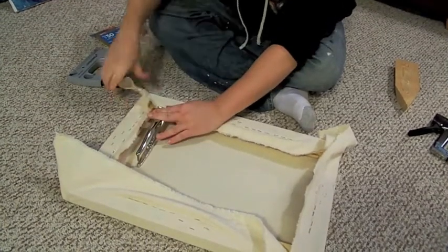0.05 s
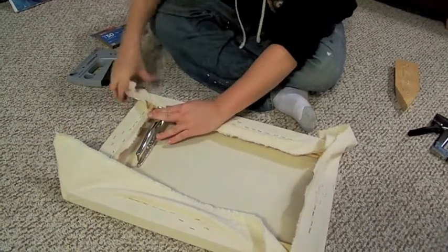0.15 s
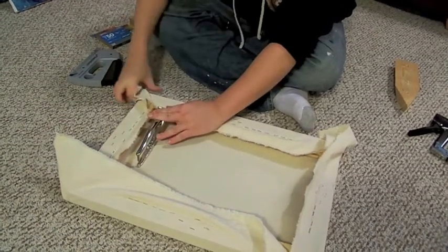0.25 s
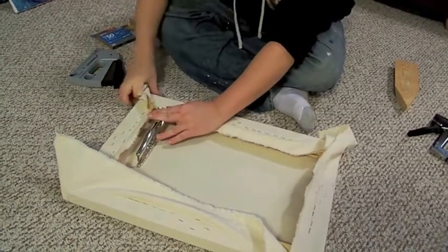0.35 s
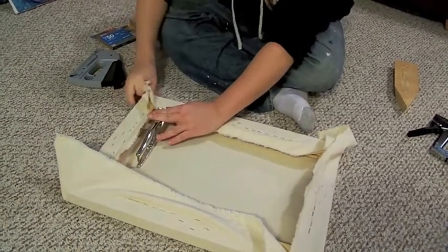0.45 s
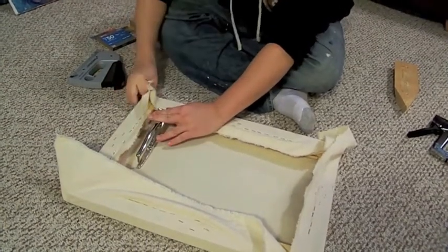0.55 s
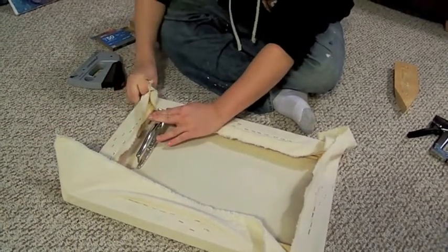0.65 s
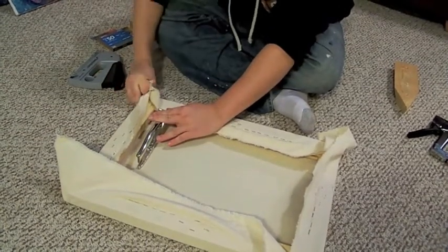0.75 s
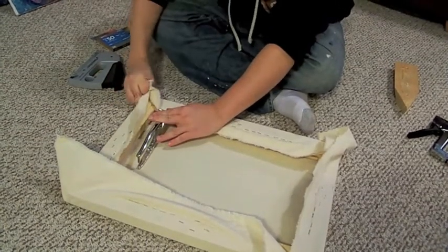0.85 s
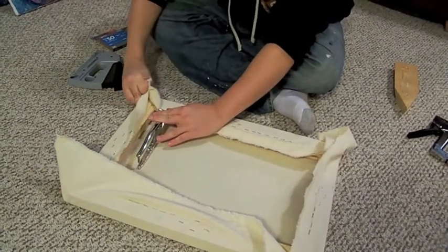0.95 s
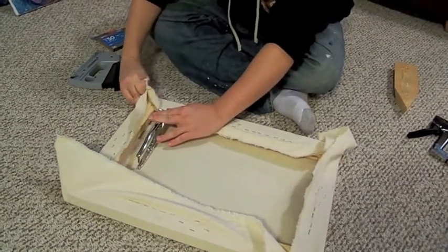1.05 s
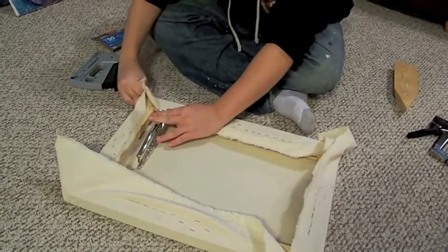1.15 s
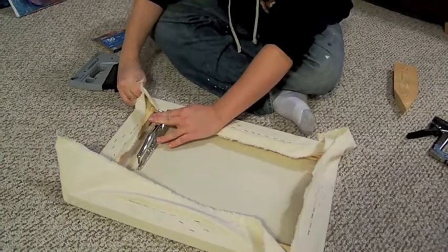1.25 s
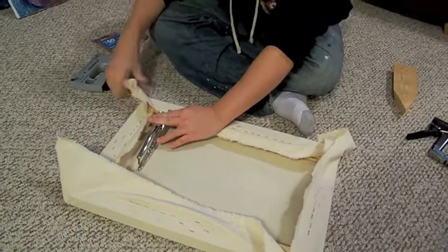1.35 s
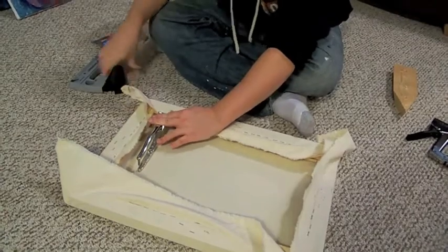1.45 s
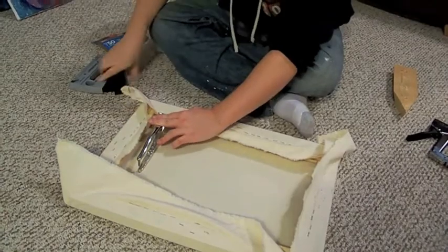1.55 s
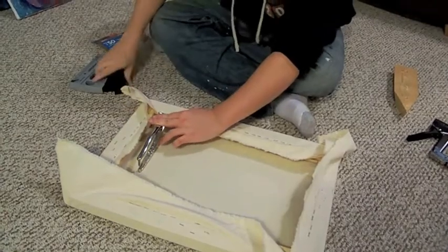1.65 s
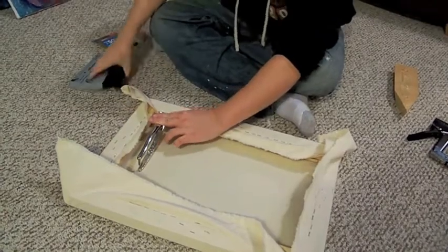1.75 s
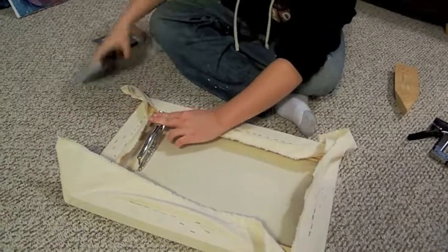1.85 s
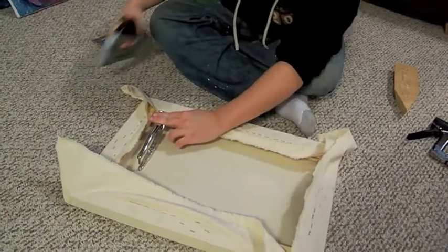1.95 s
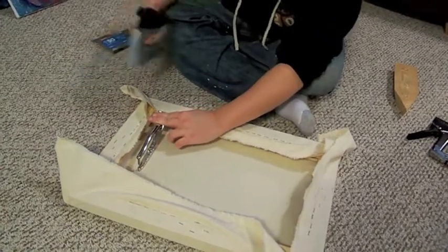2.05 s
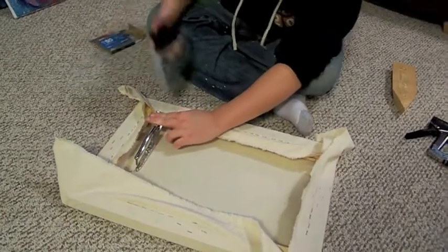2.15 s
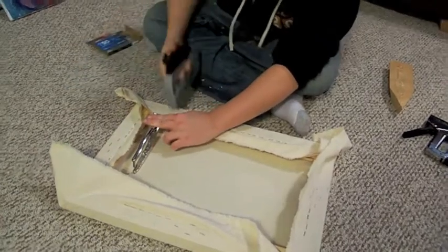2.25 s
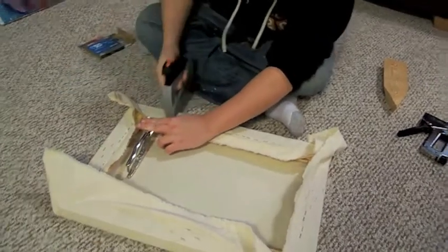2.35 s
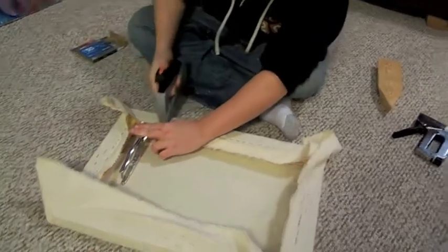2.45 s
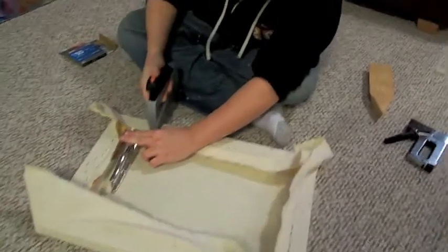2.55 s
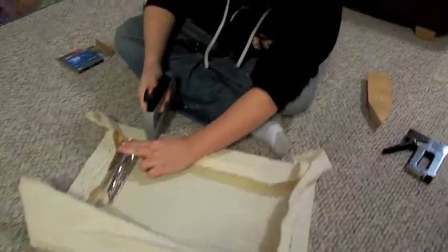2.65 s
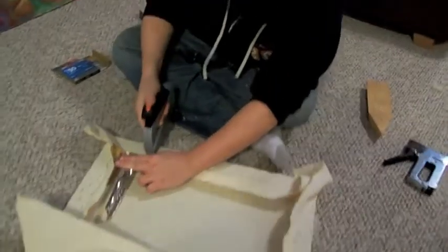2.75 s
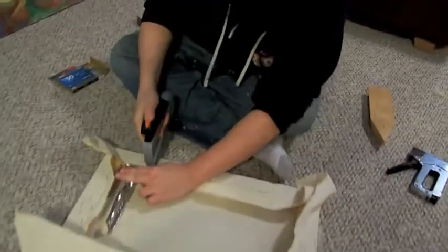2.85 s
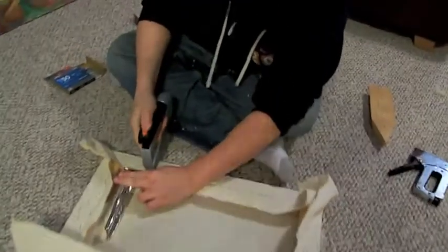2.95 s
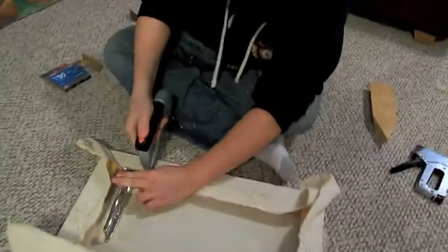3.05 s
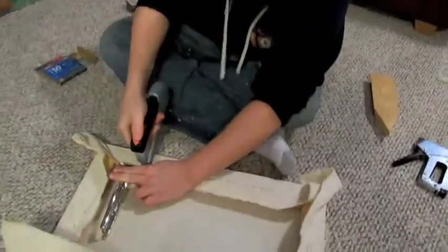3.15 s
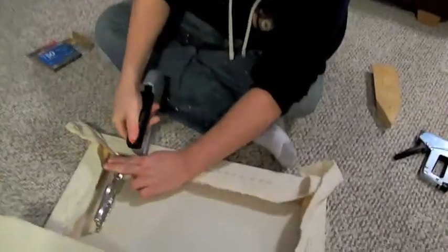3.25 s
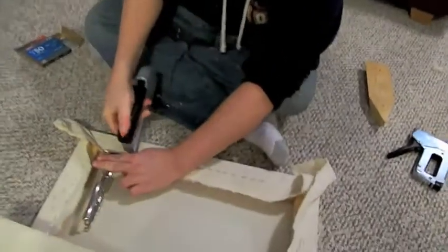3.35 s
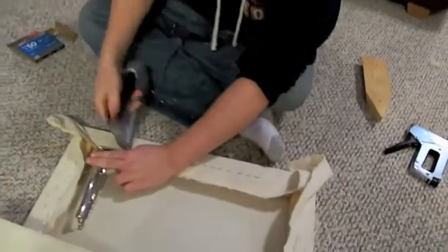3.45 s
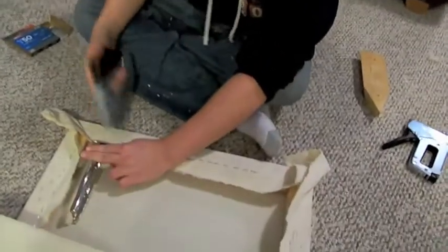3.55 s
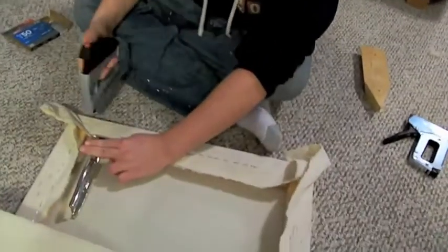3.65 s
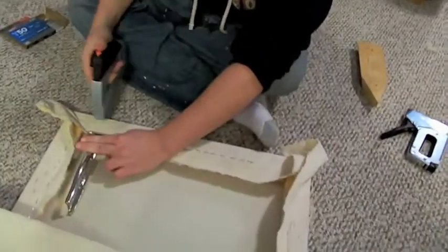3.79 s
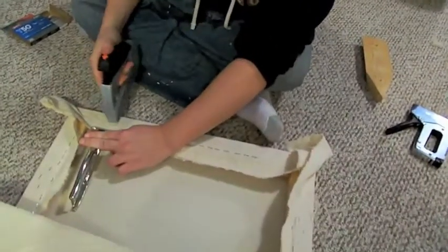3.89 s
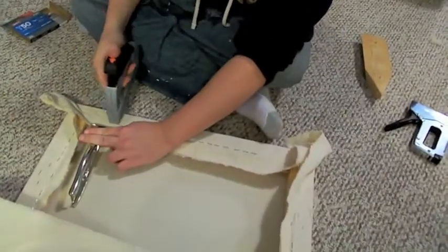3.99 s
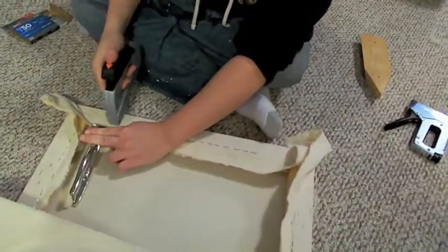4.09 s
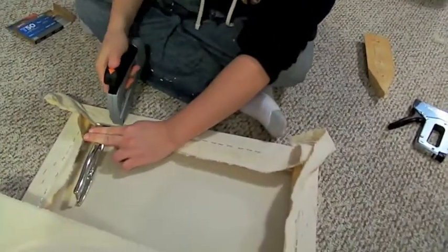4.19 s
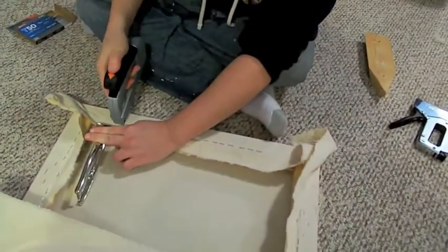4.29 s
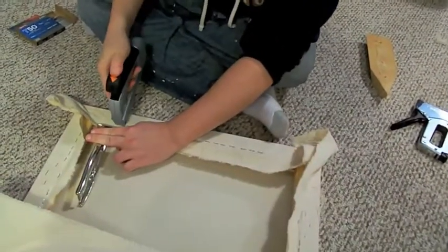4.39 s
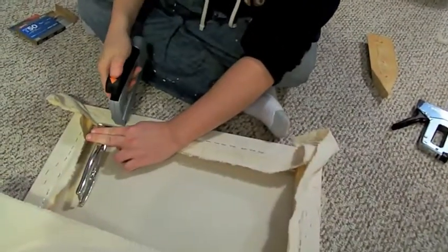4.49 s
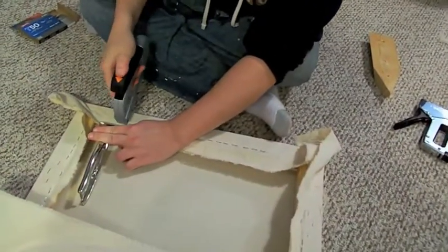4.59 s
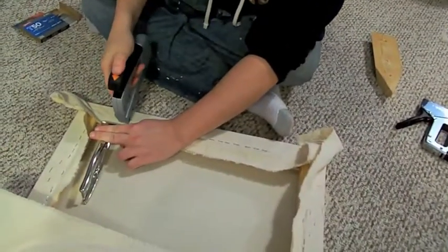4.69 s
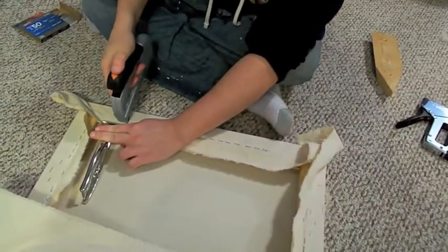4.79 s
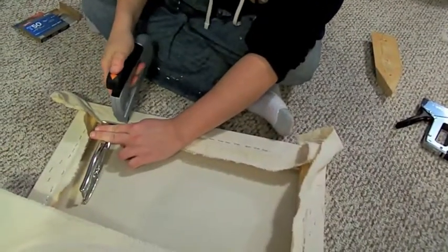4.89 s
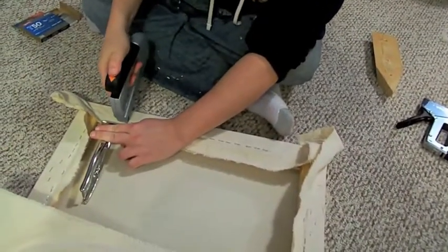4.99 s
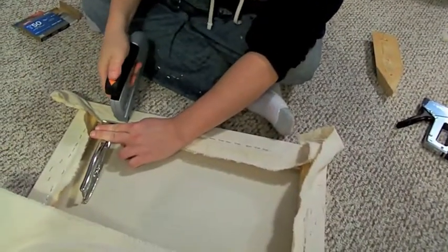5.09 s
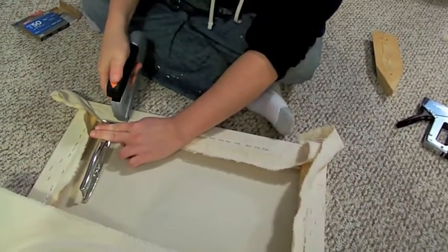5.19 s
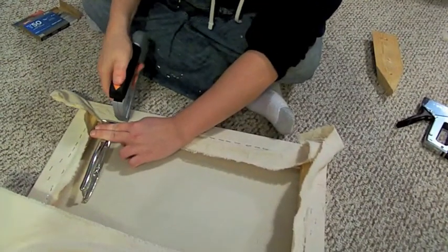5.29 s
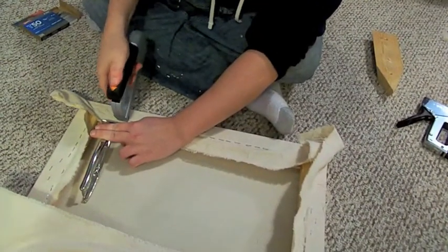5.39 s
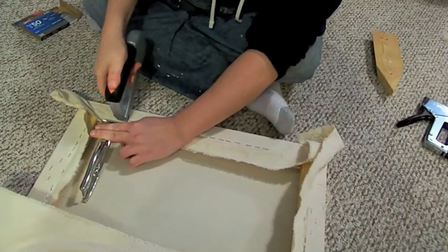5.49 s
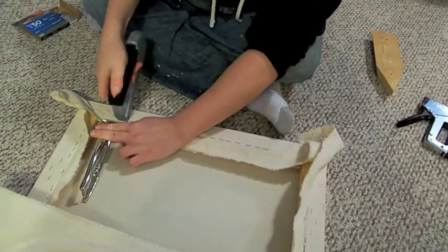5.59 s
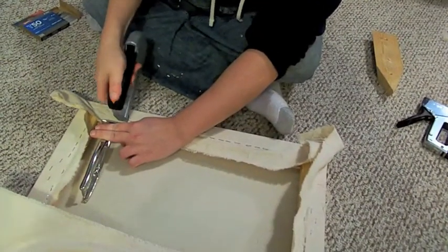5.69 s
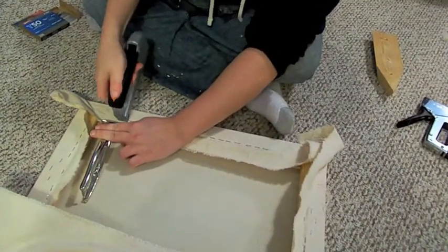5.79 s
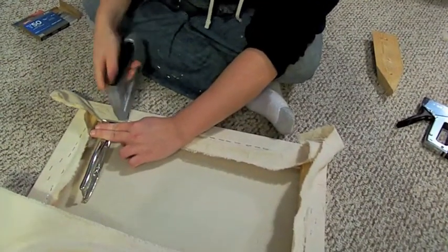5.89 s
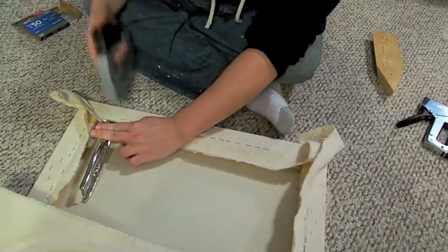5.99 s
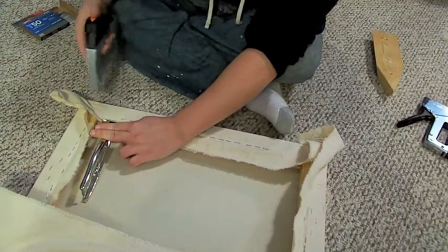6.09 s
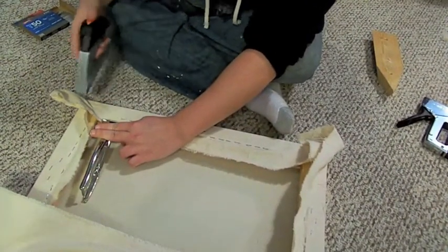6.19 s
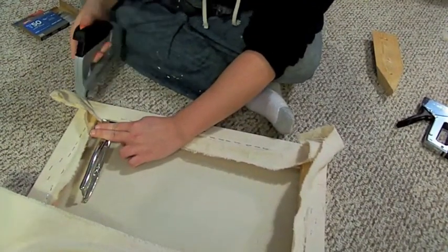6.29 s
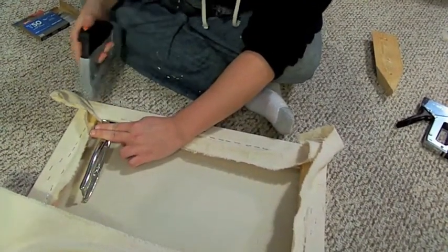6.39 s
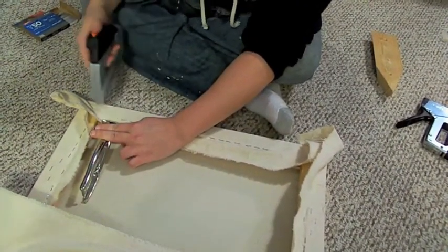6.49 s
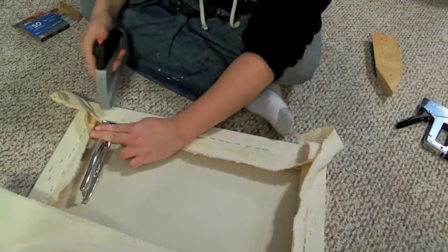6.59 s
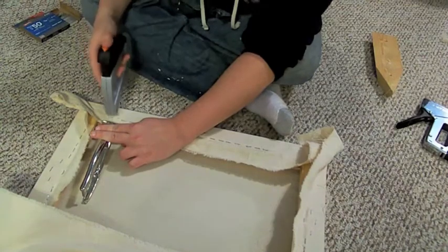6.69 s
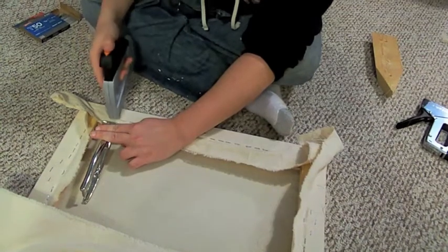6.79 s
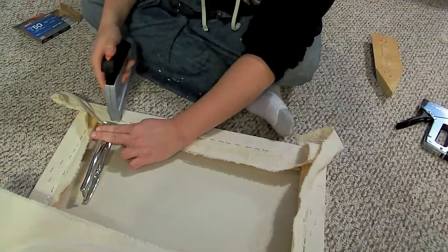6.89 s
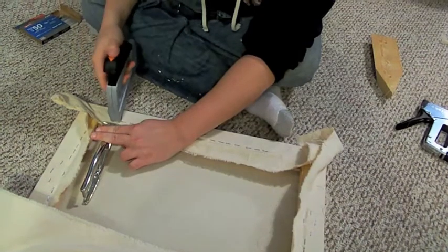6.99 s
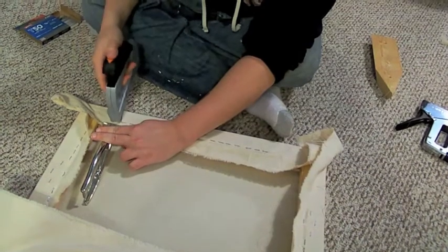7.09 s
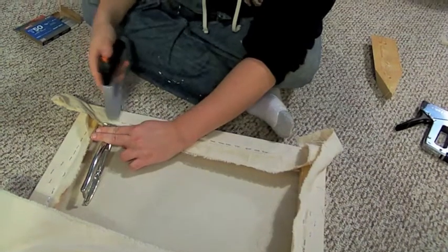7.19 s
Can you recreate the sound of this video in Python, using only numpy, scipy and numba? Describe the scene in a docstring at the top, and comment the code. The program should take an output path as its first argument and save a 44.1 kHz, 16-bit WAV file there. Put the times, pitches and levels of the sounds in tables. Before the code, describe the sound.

Over faint steady room noise, fingers softly brush canvas during the first two seconds. A steel staple gun clinks lightly as it is picked up from about 1.5 seconds, with a sharper clink at 2.1 and a few more around 3 seconds. At 3.3 seconds it fires into a wooden frame with a loud, sharp metallic snap and a brief hissy echo; the handle rattles back at 3.5. Soft, low floor rumbles follow as someone shifts their weight, mostly between 4.3 and 5 seconds. The gun clicks at 5.6 and fires again at 5.7, just as loud, with the handle rattling and clinking back around 6 seconds. Near 7 seconds there is a light knock and a faint scrape of the gun over the covered frame. The gun is close and slightly to the left, in a small carpeted room.

```python
"""A steel staple gun fires twice into canvas on a wooden frame, in a small carpeted room.
Each shot is a spring letting go and a driver (the staple pusher) slamming home; a quarter second later
the handle rattles back. Around the shots the gun clinks in the hand, fingers smooth the canvas and the
floor rumbles as someone shifts their weight. The camera's limiter turns each shot down and comes back up
about as fast as the echo fades, so the echo hangs as a hiss."""
import sys
import numpy as np
from scipy import signal
from scipy.fft import rfft, irfft
from scipy.io import wavfile
from scipy.ndimage import uniform_filter1d
from numba import njit

SR = 44100
rng = np.random.default_rng(int(sys.argv[2]) if len(sys.argv) > 2 else 0)


def master(y):
    """Save y as 16-bit WAV."""
    cut = np.clip(np.atleast_2d(y).T, -1, 1)
    pcm = np.round(cut * 32767)  # scale
    wavfile.write(sys.argv[1], SR, pcm.astype(np.int16))


N = 319328
TIME = np.arange(N) / SR
TREBLE_EDGE_HZ = 7600  # the camera loses the sound above this

# Tilt makes a sound brighter (+) or duller (-). A fade time, or t60, is the time to fall by 60 dB.
# tone of the steady background noise: (frequency [Hz], relative level [dB])
AIR_TONE = [(12, -32), (20, -2), (49, -1), (66, -8), (160, -11), (245, -13), (300, -22), (341, -18),
            (428, -17), (848, -17), (963, -21), (1120, -19), (4990, -25), (6430, -27), (8500, -54),
            (11000, -84), (18700, -120)]
# how alike that noise is on the left and right: (frequency [Hz], likeness [0-1])
AIR_LIKENESS = [(40, 0.9), (130, 0.68), (600, .55), (3000, 0.04), (7000, 0.13)]
# the gun clinks as it is picked up, set down, squeezed and lifted:
# (time [s], level [dB], tilt [dB/octave], struck part's pitch [Hz], wood knock [dB])
CLINKS = [(0.171, -39.5, -4, 5690, -16), (1.5095, -36.5, -2.5, 1536, -28), (1.5332, -38, 1.5, 1510, -12),
          (1.606, -55, 3, 2300, -22), (1.850, -34.5, -5.5, 1370, -27), (1.8632, -38.5, -8.5, 2200, -30),
          (2.013, -50, -10, 2250, -27), (2.105, -19.5, -6, 3450, -5.5), (2.129, -35.5, -3.5, 1407, -6),
          (2.8905, -31.5, 5, 2650, -15.5), (3.072, -49.5, -1.5, 4970, -18.5), (3.118, -30, -2, 2970, -10),
          (3.6449, -29.5, -4.5, 4950, -20), (3.6842, -43.5, -8.5, 2350, -22),
          (5.478, -47.5, -6.5, 2750, -28), (5.538, -47.5, -3, 4700, -26), (5.5704, -21.5, 1.5, 2950, -17.5),
          (5.9972, -23, -3, 1520, -21), (6.037, -36, -0.5, 1500, -15), (6.08, -37.5, -3, 2160, -20),
          (6.926, -50, -5, 1410, 6)]
# tone of steel hitting steel: (frequency [Hz], relative level [dB])
CONTACT_TONE = [(100, -33), (300, -15.5), (800, -16), (1400, -1), (2200, -2.5), (2700, 3), (3500, 3.5),
                (4500, 2), (5800, 2), (6900, -5), (7400, -15.5), (8000, -17.5)]
# notes the gun's steel case rings at: (pitch [Hz], relative level [dB], fade time [s])
CASE_NOTES = [(1270, -22, 0.076), (1405, -4, 0.32), (1520, 1.5, 0.24), (2015, -2, 0.21), (2140, 1.5, 0.23),
              (2160, 0.5, 0.23), (2855, 1, 0.16), (2750, -6, 0.14), (2970, -8, 0.12), (3360, -2, 0.19),
              (3970, 0.5, 0.054), (3797, -0.5, 0.12), (4440, -10, 0.15), (4260, -2.5, 0.3), (4530, 0, 0.42),
              (5300, -7, 0.06), (5490, -14, 0.098), (7660, -12.5, 0.14)]
# notes of the wooden frame, muffled by hand and carpet: (pitch [Hz], relative level [dB], fade time [s])
FRAME_NOTES = [(185, -4, 0.023), (254, -5, .04), (418, -4, 0.062), (558, -1, 0.045), (783, -2.5, 0.029),
               (1095, -6.5, 0.076), (1187, 2.5, 0.02)]
# the gun lies to the left: (frequency [Hz], left minus right [dB])
LEFT_BOOST = [(100, 5.5), (700, 0.5), (1300, 0), (2400, 4.5), (4400, 4.5), (8000, 0)]
# the room's echo: (frequency [Hz], relative level [dB], fade time [s])
ECHO_BANDS = [(100, -15.5, 0.99), (400, -7.5, 0.73), (1000, -4.5, 0.43), (2000, -3.5, 0.49),
              (3400, -1, 0.48), (5650, -9, 0.59), (8000, 16, 0.26)]
# fingers smooth the canvas: (time [s], length [s], level [dB])
FINGER_STROKES = [(.44, .14, -56.5), (1.03, .1, -63), (1.29, .07, -57.5), (1.62, .08, -57), (1.78, .1, -57),
                  (4.09, .04, -56.5), (4.81, .05, -62)]
# weight shifts on the floor: (time [s], level [dB], pitch [Hz], fade time [s])
WEIGHT_SHIFTS = [(2.07, -39.5, 39, 1.46), (3.12, -52.5, 55, 1.1), (3.68, -42.5, 78, 1.02),
                 (4.29, -33.5, 76, 0.69), (4.33, -38.5, 42, 2), (4.769, -37, 21.86, 1.44),
                 (4.79, -38, 58, 1.3), (5.28, -51, 78, 2.7), (5.86, -43, 66, 2.42), (6.38, -42, 78, 0.85),
                 (6.71, -46, 30, 3.2), (6.929, -46.5, 64, 2)]
# the gun's nose drags over the covered frame: (time [s], length [s], level [dB])
NOSE_STROKES = [(3.0, 0.075, -57), (7.118, 0.0096, -38), (7.17, 0.091, -53.5)]
# the two shots: (spring time [s], driver delay [s], handle time [s], level [dB], extra tilt [dB/octave])
SHOTS = [(3.2860, .0066, 3.5195, 0, 1), (5.6976, .0043, 5.9445, -.5, -1.5)]
# the two blows of a shot, spring then driver: (level [dB], contact length [ms], tilt [dB/octave],
# struck part's pitch [Hz], steel ring [dB], wood knock [dB])
SPRING_BLOW = (-8.5, 0.1, -3, 3000, -27.5, -12)
DRIVER_BLOW = (21.5, 4, 0.03, 5900, -35.5, -19)
# the latch slides over the driver, drops in and snaps tight; the handle meets its stop, slams home and
# shudders: (time after the latch drops in [s], level [dB], contact length [ms], tilt [dB/octave],
# struck part's pitch [Hz], steel ring [dB], wood knock [dB])
HANDLE_BLOWS = [(-.0365, -26, 2, 3, 6680, -15, -26), (0, -11.5, 1, -1.5, 1914, -16.5, -21),
                (.001, -12.5, 2.9, 10.5, 6320, -19.5, -21), (.018, -18.5, 2, -1, 2650, -10.5, -39.5),
                (.026, -13, 4.2, -0.5, 2520, -11.5, -22), (.033, -23.5, 6, -3.5, 1520, -7, -18)]


def gain(db):
    """Turn decibels into a number to multiply by."""
    return 10 ** (np.asarray(db) / 20)


def unit(x):
    """Scale a sound so that its average strength (rms) is 1."""
    return x / np.sqrt(np.mean(x ** 2))


def fade(t, t60_s):
    """A curve that starts at 1 and falls by 60 dB every t60_s seconds."""
    return np.exp(-np.log(1000) * t / t60_s)


def read_curve(hz, points):
    """Read between (frequency, value) points, spacing frequencies as the ear does."""
    point_hz, values = np.transpose(points)
    return np.interp(np.log(hz + 1), np.log(point_hz + 1), values)


def shaped(x, gain_at):
    """Change a sound's tone: multiply each frequency by gain_at(frequency)."""
    hz = np.linspace(0, SR / 2, x.shape[-1] // 2 + 1)
    return irfft(rfft(x) * gain_at(hz), x.shape[-1])


def band(x, low_hz, high_hz, order=2):
    """Keep the part of a sound between two frequencies."""
    return signal.sosfilt(signal.butter(order, [low_hz, high_hz], "band", fs=SR, output="sos"), x)


def stereo_noise(size, likeness):
    """Left and right noise: likeness 1 makes them the same, 0 unrelated."""
    mid, side = rng.standard_normal((2, size))
    return (np.sqrt(1 + likeness) * mid + np.sqrt(1 - likeness) * np.array([side, -side])) / np.sqrt(2)


def add(out, time_s, sound):
    """Mix a sound into both channels at the given time."""
    start = int(time_s * SR)
    out[:, start:start + sound.shape[-1]] += sound


def air(level_db=-54):
    """Steady room noise and microphone hiss, more alike left and right in the bass."""
    mid, side = rng.standard_normal((2, N))
    mid = shaped(mid, lambda hz: np.sqrt(1 + read_curve(hz, AIR_LIKENESS)))
    side = shaped(side, lambda hz: np.sqrt(1 - read_curve(hz, AIR_LIKENESS)))
    noise = mid + np.array([side, -side])
    return gain(level_db) * unit(shaped(noise, lambda hz: gain(read_curve(hz, AIR_TONE))))


def clink(db, tilt_db, part_hz, wood_db):
    """A knock in handling: a harder one is shorter, and the firmer grip muffles its ring."""
    harder_db = db + 42.5  # compared with a light clink at -42.5 dB
    length_ms = 2.9 * 2 ** (-harder_db / 23)
    steel_db = -6.5 - .43 * harder_db
    part_db = 6.5 - 3.5 * np.log2(part_hz / 1500)  # small, high parts ring less than big ones
    return gain(db) * blow(length_ms, tilt_db, part_hz, steel_db, wood_db, buzz_db=-2.5, part_db=part_db)


def blow(length_ms, tilt_db, part_hz, steel_db, wood_db, buzz_db=0, part_db=1):
    """Steel chatters briefly; the case and struck part ring on, loose parts buzz, the frame knocks."""
    t = np.arange(12288) / SR
    ms = t * 1000
    rise = 1 - np.exp(-ms / .16)
    contact = rise * np.exp(-np.maximum(ms - length_ms, 0) / 1.98)
    chatter = stereo_noise(len(t), .76) * contact
    crack = shaped(chatter, lambda hz: contact_tone(hz, tilt_db, part_hz))
    crack *= t < t[-1] / 2  # silence what the filter wraps round to the end
    crack *= np.sqrt(np.sum(contact ** 2) / np.sum(crack ** 2, axis=1, keepdims=True))  # match energy
    case = gain(-5) * ring(CASE_NOTES, t, scatter_db=1.5, phase_spread=.3, tilt_db=tilt_db)
    part = gain(part_db) * ring([(part_hz, 0, .07)], t, scatter_db=0, phase_spread=.39)
    buzz = gain(buzz_db) * loose_parts(t, tilt_db, part_hz)
    wood = gain(wood_db) * ring(FRAME_NOTES, t, scatter_db=1, phase_spread=.2)
    return crack + rise * (gain(steel_db) * (case + part + buzz) + wood)


def contact_tone(hz, tilt_db, part_hz, peak_db=6, peak_width=.18):
    """Tone of steel on steel: brighter when hard, and stronger near the struck part's pitch."""
    resonance_db = peak_db / (1 + ((hz / part_hz - 1) / peak_width) ** 2)
    brightness_db = tilt_db * np.log2(np.maximum(hz, 1000))
    return gain(read_curve(hz, CONTACT_TONE) + brightness_db + resonance_db) * (hz < TREBLE_EDGE_HZ + 500)


def ring(notes, t, scatter_db, phase_spread, tilt_db=0):
    """A struck object rings with fading notes, in a slightly different mix on every blow."""
    hz, db, t60_s = np.transpose(notes)[:, :, None]
    strength = gain(db + tilt_db * np.log2(hz) + scatter_db * rng.standard_normal(hz.shape))
    hz = hz * (1 + .0056 * rng.standard_normal(hz.shape))  # the grip nudges each pitch
    phase = rng.uniform(0, 2 * np.pi, hz.shape)
    phase = phase + phase_spread * rng.standard_normal((2, len(hz), 1))  # each microphone has its own
    waves = strength * np.sin(2 * np.pi * hz * t + phase) * fade(t, t60_s)
    return waves.sum(axis=1) / np.sqrt(np.sum(strength ** 2) / 2)


def loose_parts(t, tilt_db, part_hz, ticks_per_s=1500, t60_s=.22):
    """Spring coils and the strip of staples buzz against the case: many tiny ticks that die away."""
    ticks = stereo_noise(len(t), .21) * (rng.random(len(t)) < ticks_per_s / SR)
    return unit(shaped(ticks, lambda hz: contact_tone(hz, tilt_db, part_hz))) * fade(t, t60_s)


def direct_sound(x, lag_s=.00004):
    """The left microphone hears the gun louder and a tiny bit later."""
    left = shaped(x[0], lambda hz: gain(read_curve(hz, LEFT_BOOST) / 2) * np.exp(-2j * np.pi * hz * lag_s))
    right = shaped(x[1], lambda hz: gain(-read_curve(hz, LEFT_BOOST) / 2))
    return np.array([left, right])


def room_echo(x, tail_db=-7, ceiling_db=-19, ceiling_s=.0175, build_s=.0047):
    """The carpet swallows the first bounce, leaving a blurred ceiling echo and a smooth, fading tail."""
    t = np.arange(int(.7 * SR)) / SR
    noise = stereo_noise(len(t), -.05)
    tail = np.zeros_like(noise)
    for band_hz, db, t60_s in ECHO_BANDS:
        share = [(hz, float(hz == band_hz)) for hz, _, _ in ECHO_BANDS]  # picks out this band
        tail += gain(db) * shaped(noise, lambda hz: read_curve(hz, share)) * fade(t, t60_s)
    tail *= 1 - np.exp(-(t / build_s) ** 2)
    ceiling = stereo_noise(len(t), .31) * np.exp(-((t - ceiling_s) / .00053) ** 2)
    echo = (gain(tail_db) * unit(tail) + gain(ceiling_db) * unit(ceiling)) / np.sqrt(len(t))
    return signal.fftconvolve(x, echo, axes=1)[:, :N]


def swells(strokes):
    """Loudness of rubbing strokes: each rises and falls smoothly around its time."""
    return sum(gain(db) * np.exp(-2 * ((TIME - time_s) / length_s) ** 2)
               for time_s, length_s, db in strokes)


def canvas_rustle(grain_db=3):
    """Threads slip under the fingers: swells of grainy hiss."""
    grain = gain(grain_db * unit(uniform_filter1d(rng.standard_normal(N), size=200)))
    hiss = unit(band(stereo_noise(N, .59) * grain, 1430, 4600))
    return swells(FINGER_STROKES) * hiss


def floor_rumble(pitch_spread=.27, attack_s=.0091, size=65536):
    """Each shift of weight starts a fading rumble in the floor; higher ones scuff the carpet more."""
    t = np.arange(size) / SR
    rise = 1 - np.exp(-(t / attack_s) ** 2)
    out = np.zeros((2, N + size))
    for time_s, db, hz, t60_s in WEIGHT_SHIFTS:
        low_hz, high_hz = hz * (1 - pitch_spread), hz * (1 + pitch_spread)
        rumble = unit(band(stereo_noise(size, .94), low_hz, high_hz, order=3))
        scuff = gain(-19) * hz / 110 * unit(band(stereo_noise(size, .63), 110, 240, order=3))
        add(out, time_s, gain(db) * rise * fade(t, t60_s) * (rumble + scuff))
    return out[:, :N]


def nose_drag(slips_per_s=900, rub_db=-7):
    """The gun's nose catches and slips quickly over the weave; the frame gives it its tone."""
    slips = (rng.random(N) < slips_per_s / SR) * rng.random(N)
    scrape = unit(band(slips, 460, 640))
    rub = gain(rub_db) * unit(band(stereo_noise(N, .31), 280, 740))
    return swells(NOSE_STROKES) * (scrape + rub)


def staple_gun():
    """All the gun's blows: spring, driver and returning handle for each shot, plus the clinks."""
    out = np.zeros((2, N + SR))
    for spring_s, driver_delay_s, handle_s, shot_db, extra_tilt_db in SHOTS:
        driver_s = spring_s + driver_delay_s
        for time_s, settings in ((spring_s, SPRING_BLOW), (driver_s, DRIVER_BLOW)):
            db, length_ms, tilt_db, *ringing = settings
            add(out, time_s, gain(shot_db + db) * blow(length_ms, tilt_db + extra_tilt_db, *ringing))
        add(out, driver_s, gain(shot_db + DRIVER_BLOW[0]) * recoil())
        for after_s, db, *settings in HANDLE_BLOWS:
            add(out, handle_s + after_s, gain(shot_db + db) * blow(*settings, buzz_db=1.5, part_db=3.5))
    for time_s, *settings in CLINKS:
        add(out, time_s, clink(*settings))
    return out[:, :N]


def recoil(relative_db=-21, pitch_hz=110, t60_s=.034):
    """The driver's blow shoves frame and canvas into the carpet: one dull thump."""
    t = np.arange(4096) / SR
    return gain(relative_db) * np.sin(2 * np.pi * pitch_hz * t) * fade(t, t60_s)


@njit
def follow_peaks(x, attack, fall):
    """Track loudness: jump up quickly at a peak, then sink by the same ratio each sample."""
    out, level = np.empty(len(x)), 1e-9
    for i in range(len(x)):
        level = level + (x[i] - level) * attack if x[i] > level else level * fall
        out[i] = level
    return out


def limiter(x, limit_db=-1, attack_s=.00059, release_db_per_s=145):
    """Turn both channels down at a loud peak, then back up at a steady rate."""
    attack = 1 - np.exp(-1 / (attack_s * SR))
    fall = float(gain(-release_db_per_s / SR))
    peak = follow_peaks(np.abs(x).max(axis=0), attack, fall)
    return x * np.minimum(1, gain(limit_db) / peak)


def hollow(x, dip_hz=305, width_hz=110, depth=.61):
    """The camera sounds a little hollow: its tone has a dip just above the bass."""
    notched = signal.lfilter(*signal.iirnotch(dip_hz, dip_hz / width_hz, fs=SR), x)
    return x + depth * (notched - x)


def scene():
    """The gun and its echo, over canvas, floor and background noise."""
    gun = staple_gun()
    return direct_sound(gun) + room_echo(gun) + canvas_rustle() + nose_drag() + floor_rumble() + air()


def record(dry):
    """The camera turns loud peaks down, flattens what gets past and cuts off the high treble."""
    flattened = np.clip(limiter(dry), -.8, .8)
    dulled = signal.sosfilt(signal.cheby1(10, .3, TREBLE_EDGE_HZ, fs=SR, output="sos"), hollow(flattened))
    trimmed = np.clip(dulled, -.86, .86)  # the tallest peaks are flattened once more
    rounded = signal.sosfilt(signal.butter(2, 12500, fs=SR, output="sos"), trimmed)
    return signal.sosfilt(signal.ellip(8, .2, 70, 16000, fs=SR, output="sos"), rounded)


dry = scene()
out = record(dry)
master(out)
```